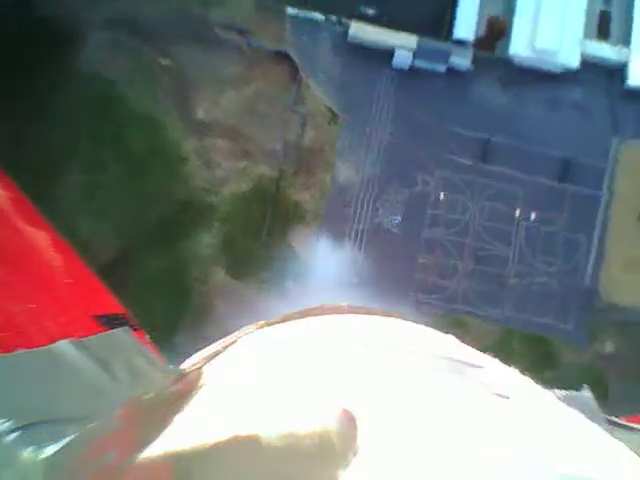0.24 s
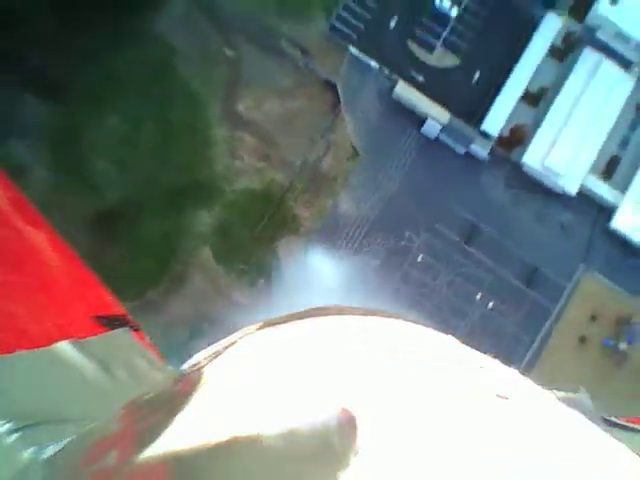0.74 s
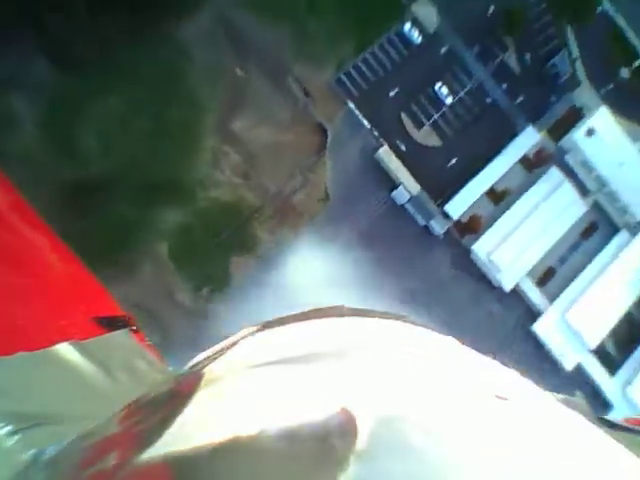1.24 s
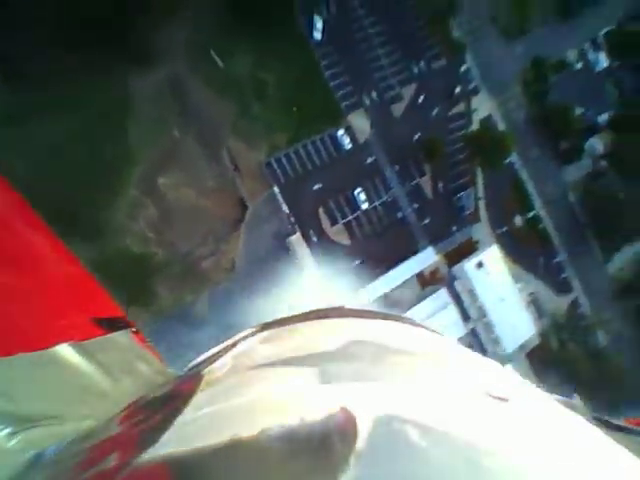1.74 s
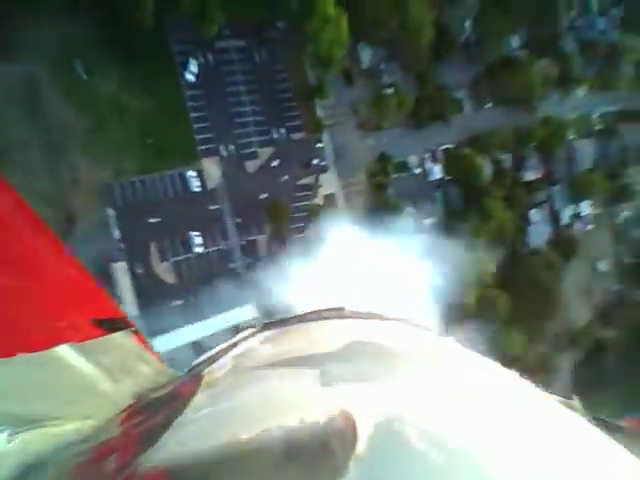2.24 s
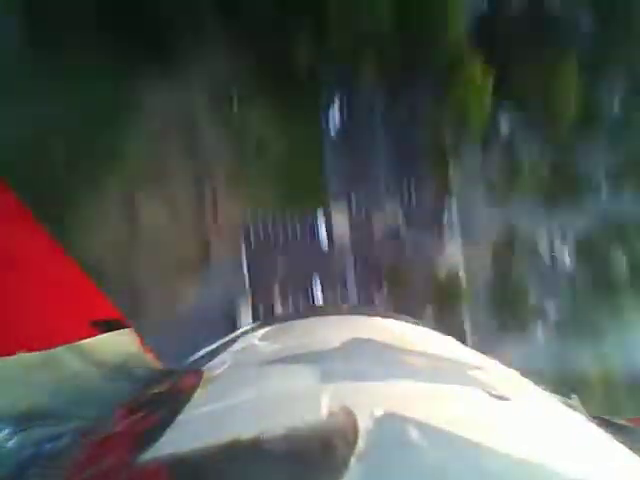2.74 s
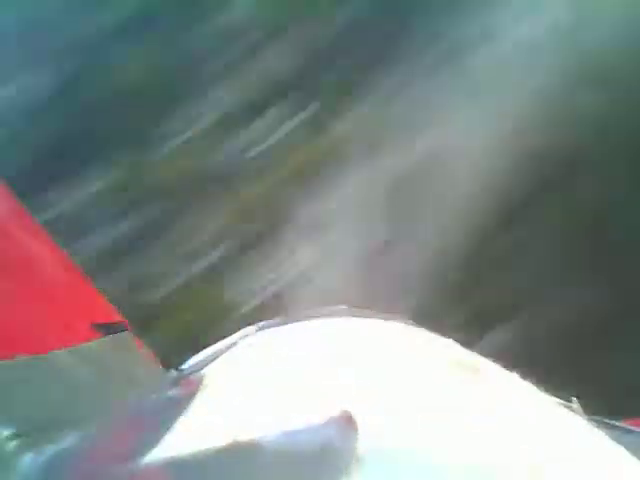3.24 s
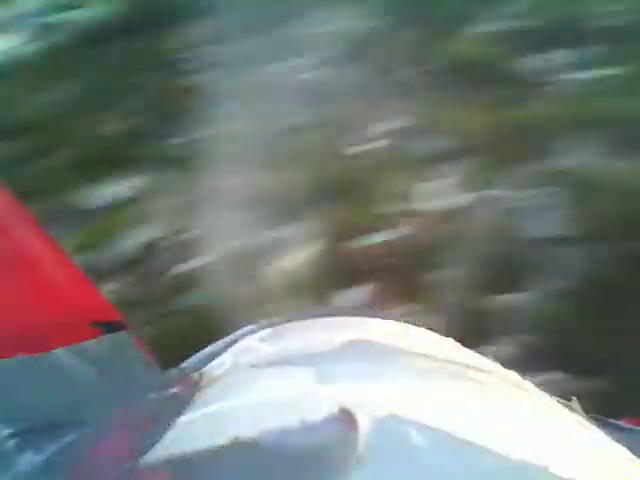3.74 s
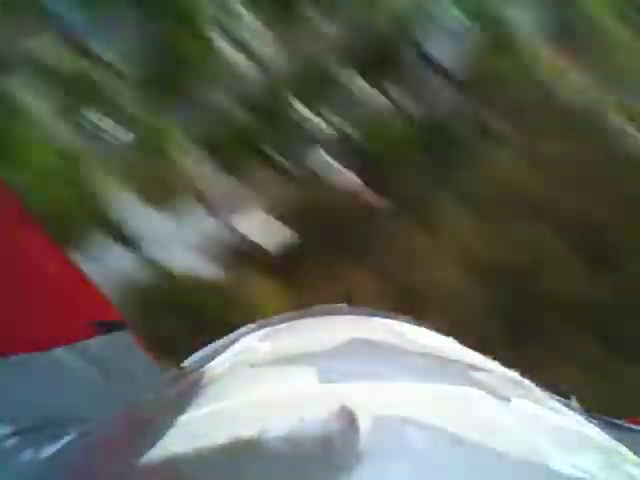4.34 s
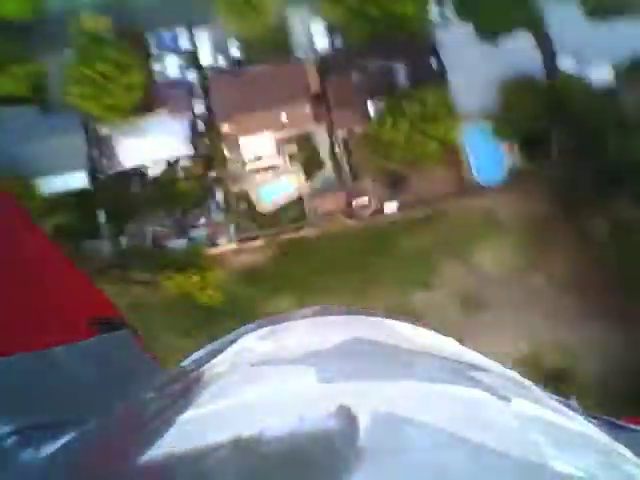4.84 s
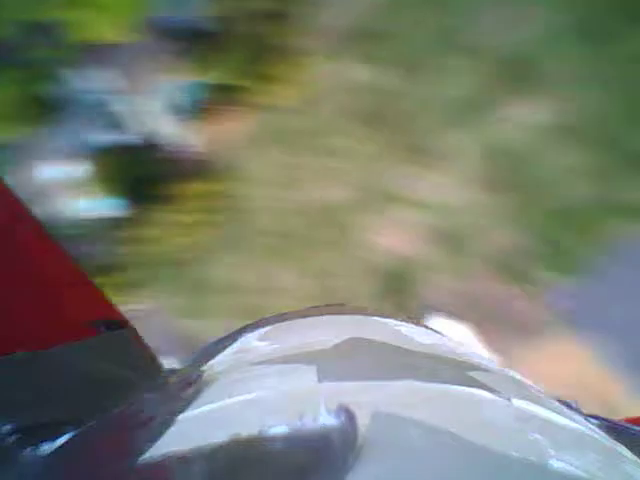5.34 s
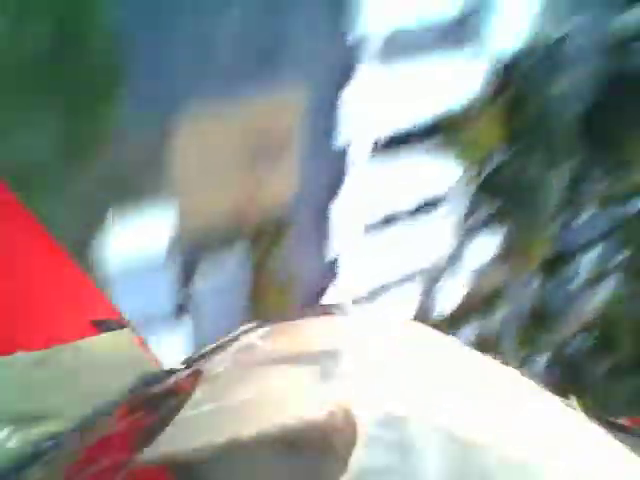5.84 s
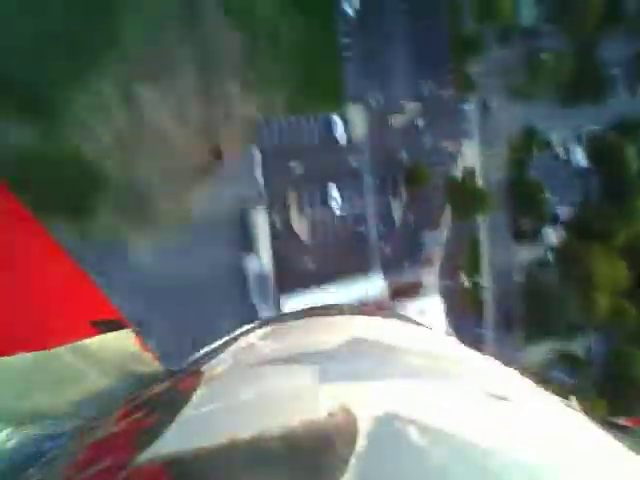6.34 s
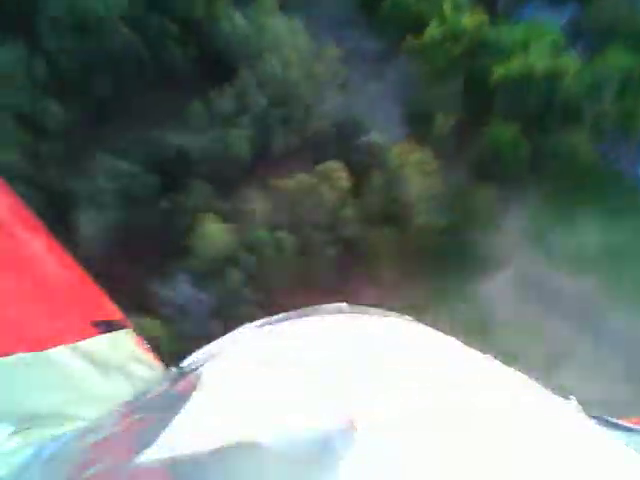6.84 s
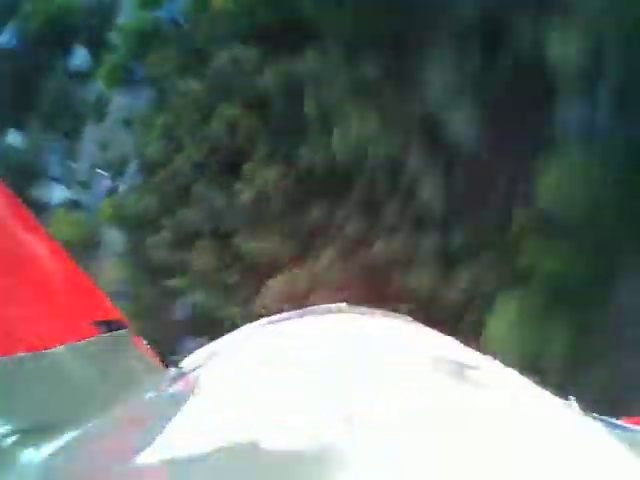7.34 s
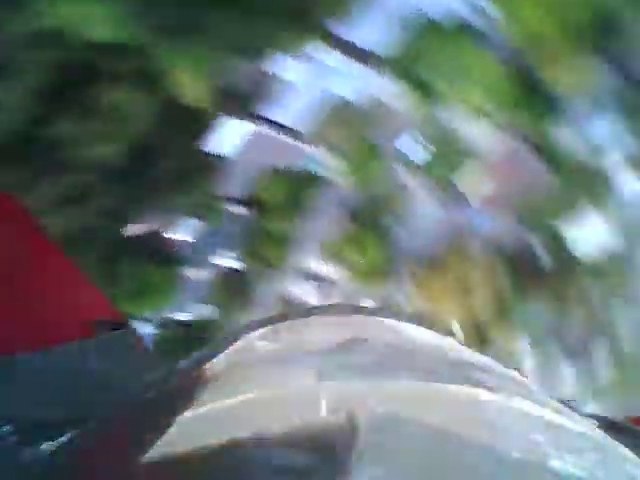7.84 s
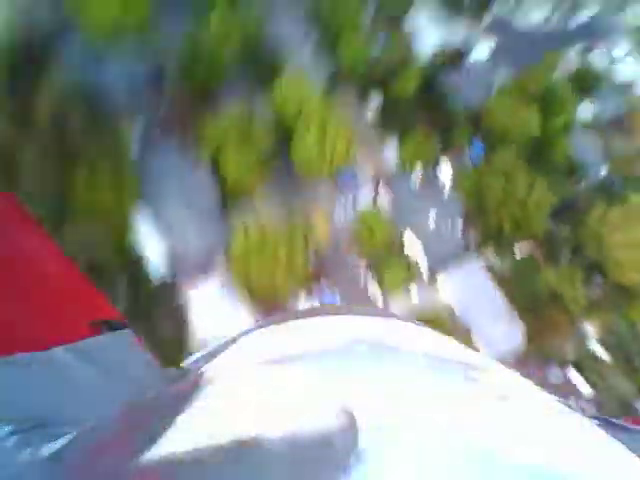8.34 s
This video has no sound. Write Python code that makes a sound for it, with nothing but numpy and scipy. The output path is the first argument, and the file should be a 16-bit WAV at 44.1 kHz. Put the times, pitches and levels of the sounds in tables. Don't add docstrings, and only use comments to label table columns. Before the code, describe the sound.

Close on board a model rocket in open sky, a strong hissing rush of air thins and grows ragged over two seconds. A charge pops abruptly with a choked, overloaded slam. Afterwards the tube swings through gusts, with low wind thumps, hollow knocks, cord scrapes and sharp little ticks. The small built-in microphone sounds dull and clips on the hardest hits.

```python
import sys
import numpy as np
from scipy import signal
from scipy.fft import rfft, irfft
from scipy.io import wavfile
from scipy.ndimage import uniform_filter1d

SR = 44100
rng = np.random.default_rng(int(sys.argv[2]) if len(sys.argv) > 2 else 0)


def digitize_waveform(pressure):
    field = np.atleast_2d(pressure).T
    bounded = np.clip(field, -1, 1)
    quanta = np.round(bounded * 32767).astype(np.int16)
    wavfile.write(sys.argv[1], SR, quanta)


def how_loud(loudness_db):
    steps = np.asarray(loudness_db, float) / 20
    return 10 ** steps


N = 379260
PORT_HZ = 168


def unit_rms(x):
    return x / np.sqrt(np.mean(x ** 2))


def curve(rows, column):
    rows = np.array(rows)
    return how_loud(np.interp(np.arange(N) / SR, rows[:, 0], rows[:, column], left=-120, right=-120))


def walk(rate):
    hold = int(SR / rate)
    steps = np.repeat(rng.standard_normal(N // hold + 1), hold)
    return unit_rms(uniform_filter1d(uniform_filter1d(steps, hold), hold)[:N])


def port(x):
    return signal.lfilter(*signal.butter(1, PORT_HZ, "high", fs=SR), x)


def turbulence(shape, shared_db, own_db, rate):
    hz = np.maximum(np.fft.rfftfreq(N, 1 / SR), 1)
    octave = np.log2(hz)
    shape_hz, shape_db = np.transpose(shape)
    colour = how_loud(np.interp(octave, np.log2(shape_hz), shape_db, left=-90, right=-90))
    colour = colour * np.hypot(1, PORT_HZ / hz)
    spectrum = rfft(rng.standard_normal(N)) * colour
    shared = walk(rate)
    air = 0
    for centre in np.arange(4, 12.6, .5):
        band = irfft(spectrum * np.clip(1 - 2 * abs(octave - centre), 0, 1), N)
        air = air + band * how_loud(shared_db * shared + own_db * walk(.6 * rate))
    return air / np.sqrt(np.mean(port(air) ** 2))


def crackle(rate, spread_db, length_ms, lift):
    when = rng.random(N) < rate / SR
    size = how_loud(spread_db * rng.standard_normal(N))
    spark = np.repeat(np.hanning(64) ** (64 / 44 / length_ms) ** 2, 4)
    return 1 + lift * signal.fftconvolve(when * size, spark, "same")


def swells(crest_s, peak_db, rise_s, fall_s, depth_db, rest_db, edge):
    opens_s = 2.23
    t = np.arange(0, N + 64, 64) / SR
    late = t[:, None] - crest_s
    before, after = -late / np.maximum(rise_s, .003), late / np.maximum(fall_s, .003)
    db = peak_db - depth_db * np.where(late < 0, before, after) ** edge
    power = (how_loud(db) ** 2).sum(axis=1) + how_loud(rest_db) ** 2
    return np.interp(np.arange(N) / SR, t, np.sqrt(power) * (t > opens_s))


def wind():
    # time in seconds, air speed in dB, sideways wobble in dB
    climb = [
        (0.0, -12.5, -25),
        (0.92, -15.5, -20.5),
        (1.59, -20.5, -19),
        (1.89, -27, -29),
        (2.15, -27.5, -29.5),
        (2.18, -28, -34),
    ]
    # crest in seconds, length in seconds, thump on the port in dB,
    # air along the tube in dB
    swings = [(2.38, 0.34, -33.5, -46.5), (2.656, 0.86, -32, -37), (2.966, 0.4, -24, -34.5),
              (3.126, 0.11, -23, -32.5), (3.375, 0.16, -25.5, -36), (3.674, .2, -21, -35.5),
              (3.809, 0.16, -32, -36.5), (3.989, 0.16, -27.5, -38.5), (4.087, 0.18, -29, -36),
              (4.352, 0.14, -30, -40.5), (4.45, .1, -35, -36.5), (4.672, 0.26, -33, -35.5),
              (5.047, .12, -35, -33), (5.261, .18, -24, -34), (5.52, 0.45, -39.5, -36.5),
              (5.769, 0.26, -35, -41), (5.983, 0.27, -26, -33), (6.187, 0.13, -33, -31),
              (6.366, 0.36, -26, -32.5), (6.635, .15, -22.5, -35), (6.763, 0.12, -35, -39),
              (6.901, 0.061, -39, -32), (7.02, 0.14, -27.5, -36.5), (7.315, 0.33, -33, -43),
              (7.529, 0.18, -18, -24), (7.765, 0.4, -30.5, -35.5), (8.097, .3, -32.5, -36),
              (8.307, 0.08, -19, -35.5), (8.396, 0.13, -17.5, -33.5), (8.595, 0.11, -19.5, -35)]
    # time in seconds, lift of the sparks (ratio)
    sparks = [
        (.3, 0.74),
        (1.2, 1.4),
        (1.8, 2.4),
    ]
    # frequency in Hz, density in dB per Hz
    buffet = [(12, -51.5), (20, -12.5), (97, -4), (141, -1.5), (226, -3.5), (290, -9.5), (500, -13.5),
              (700, -52)]
    fast_buffet = [(12, -48.5), (20, -10.5), (296, 4.5), (500, -7), (650, -31.5), (1100, -120)]
    rush_shape = [(150, -24.5), (250, -2), (444, 2), (794, -0.5), (1400, -4.5), (1750, -15), (2860, -28.5),
                  (4840, -67)]
    hiss_shape = [(880, -29.5), (1500, -11), (2280, -14.5), (2560, -15), (3580, -21), (4070, -22),
                  (5290, -61), (8950, -120)]
    rise_share, depth_db, edge = 0.34, 11, 1.09
    lull_thump_db, lull_air_db = -40.5, -50
    hiss_db, hiss_per_speed = -5.5, 1.324
    wind_stop = .7

    crest, length, thump_db, air_db = np.transpose(swings)
    rise, fall = rise_share * length, (1 - rise_share) * length
    speed = curve(climb, 1)
    thumps = swells(crest, thump_db, rise, fall, depth_db, lull_thump_db, edge)
    gusts = swells(crest, air_db, rise, fall, depth_db, lull_air_db, edge)
    climbing = turbulence(fast_buffet, 0.79, 1.7, 40) * curve(climb, 2)
    swinging = turbulence(buffet, 2.8, 1.7, 30) * thumps
    rush = turbulence(rush_shape, 0.76, 1.5, 40) * (speed + gusts)
    lift = np.interp(np.arange(N) / SR, *np.transpose(sparks))
    sparking_hiss = unit_rms(turbulence(hiss_shape, .8, 0.44, 60) * crackle(57, 2.3, 1.6, lift))
    hiss = sparking_hiss * how_loud(hiss_db) * speed ** hiss_per_speed
    return wind_stop * np.tanh((climbing + swinging + rush + hiss) / wind_stop)


def blast():
    fires_s, rise_s, hold_s, fall_s = 2.184, 0.0044, 0.037, 0.0048
    blast_db = -10
    t = np.arange(N) / SR - fires_s
    envelope = np.exp(np.minimum(t, 0) / rise_s - np.maximum(t - hold_s, 0) / fall_s)
    gas = turbulence([(150, -8), (800, 3.5), (2000, -6.5), (4300, -11.5)], 2.4, 0.91, 200)
    return gas * how_loud(blast_db) * envelope


def slams():
    surge_s, surge_for_s, throws = 2.206, .0155, 9
    slam_db, release_s = -12.5, .008
    pinned_db = -30
    t = np.arange(N) / SR
    stays = np.cumsum(np.append(0, .3 + rng.random(throws - 1)))
    times = surge_s + surge_for_s * stays / stays[-1]
    stops = np.append(0., (-1.) ** np.arange(throws))
    side = uniform_filter1d(stops[np.searchsorted(times, t)], 8)
    release = np.exp(-np.maximum(t - times[-1], 0) / release_s)
    free = np.where((t > times[0]) & (t < times[-1]), how_loud(pinned_db), 1)
    return how_loud(slam_db) * side * release, free


def cord():
    # crest in seconds, level in dB, rise in seconds, fall in seconds
    drags = [(2.24, -26.5, .01, 0.069), (2.365, -29, .04, 0.018), (2.439, -28, .03, 0.055),
             (2.595, -34, 0.16, 0.11), (3.125, -29, 0.093, 0.16), (3.504, -33.5, 0.15, 0.13),
             (3.74, -36.5, .1, 0.19), (3.91, -31, 0.032, 0.014), (4.12, -34.5, 0.11, 0.28),
             (2.84, -40.5, 0.067, .03), (4.445, -35.5, 0.015, 0.16), (4.66, -35, 0.081, 0.1),
             (4.8, -36, 0.13, 0.12), (5.06, -30, .07, 0.034), (5.275, -40, 0.12, 0.11),
             (5.505, -35.5, 0.15, 0.034), (5.75, -38.5, 0.21, 0.098), (5.895, -32, 0.067, 0.026),
             (6.199, -26, 0.028, 0.031), (6.34, -38.5, 0.028, 0.1), (6.636, -40.5, 0.063, 0.092),
             (6.79, -37.5, 0.042, 0.039), (6.9, -36, 0.041, 0.045), (7.03, -28.5, 0.043, 0.027),
             (7.295, -46.5, 0.18, 0.42), (7.61, -36.5, 0.14, .1), (7.75, -30, 0.059, 0.036),
             (7.95, -40, 0.23, 0.23), (8.245, -33.5, 0.054, 0.044), (8.4, -32.5, .03, 0.031)]
    # frequency in Hz, density in dB per Hz
    scrape = [(590, -32), (1000, -13), (1500, -10.5), (1850, 1.5), (2400, -8.5), (3050, -3.5), (4200, -16),
              (5290, -50.5)]
    depth_db, slack_db, edge = 21, -50, 1.57
    slips = how_loud(2.4 * walk(30)) * crackle(110, 2.3, 2.0, 2.46)
    rubbing = unit_rms(turbulence(scrape, 3.3, 2.2, 70) * slips)
    return rubbing * swells(*np.transpose(drags), depth_db, slack_db, edge)


def contacts():
    # start in seconds, tube peak in dB, wall peak in dB,
    # camera case peak in dB, contact in ms
    blows = [(2.2455, -43, -11.8, -18, 2.5), (2.3394, -6.5, -6, -16, 4.1), (2.413, -11, -5, -10.5, 4),
             (3.2546, -8, -1, -11.5, 3.2), (3.8053, -11, -18, -16.5, 7.2), (4.4357, -11.5, -9, -11.5, 3.4),
             (5.0079, -10.5, -1.5, -5, 3.9), (5.3891, -12.5, -15, -27, 4.8), (5.421, -5.5, -15, -13.5, 1.5),
             (5.435, -9.5, -8, -2, 1.4), (5.4756, -15.5, -6, -31, 4.1), (5.4969, -17.5, -5, -28, 2.3),
             (5.8628, -8, -5, -8.5, 0.86), (5.8753, -8, -3, -17, 5.1), (6.0377, -18, -8.5, -2, 3.1),
             (6.1944, -16.5, -2.5, -6.5, 2), (6.4875, -15, -4, -5.5, 3.55), (6.6419, -20, -9.5, -16, 2.2),
             (6.9963, -13.5, -14.5, -22, 4.1), (8.0786, -7.5, 0, -0.5, 3.8), (8.381, -23, -8, -26, 2.5),
             (8.5164, -12.5, -5, -34, 4.8), (8.5343, -5, -6, -12.9, 6.4), (8.5779, -16.5, -7, -11, 2.7)]
    # start in seconds, peak in dB, contact in ms
    swivel = [(2.2332, -4, 1), (2.6328, -5.5, 0.8), (2.645, -19.5, 3.3), (3.1785, -2, 2.2),
              (3.201, -23, 2.2), (3.2343, -6, 1), (3.27, -19, 1.5), (3.281, -16.5, 0.83), (3.415, -26, 1.3),
              (3.504, -16, 8.8), (3.5234, -3, 1.83), (3.5354, -11, 1.8), (3.8255, -3, 2.2),
              (4.186, 3, 1.31), (4.191, -4.5, .84), (4.2026, -4, 1), (4.223, -17.5, 1.3), (4.289, -39, 1.1),
              (4.446, -3.5, 2.36), (4.505, -23.5, 2.4), (4.8106, 5, 1.24), (4.834, -36, 1.3),
              (5.032, -10.5, 2.3), (5.7785, -21.5, 1.1), (7.0564, -8, 2.7), (7.1951, -14.5, 1.94),
              (7.9143, 1.5, 1.8), (8.0339, -18, .81)]
    # start in seconds, peak in dB, lean to the tube's hollow in dB, contact in ms
    touches = [(2.5681, -27, -10, 17), (2.76, -17, -5.5, 4.5), (2.996, -20, 12, 2.7),
               (3.012, -14.5, 17, .81), (3.0635, -22.5, -6, 11.6), (3.1035, -19, -7.5, 17),
               (3.361, -20.5, -13, 8.7), (3.463, -23, -25, 4.5), (3.766, -16, 24, 1.2),
               (3.9072, -26, -6, 4.2), (4.78, -26.5, -1, 11), (4.9965, -15, -13, 6.2),
               (5.265, -23, -9, 7.9), (5.7242, -24.5, 1, 3.3), (6.0595, -16.5, -21, 3),
               (6.2301, -17, -6, 4.2), (6.3123, -19.5, 7, 15), (6.63, -19, -6, 4.8),
               (6.8944, -19.5, -4, 8.7), (7.008, -21, 8, 3.2), (7.2943, -22, -5, 4.9),
               (7.326, -20.5, -9, 1.9), (7.462, -23.5, -6, 5.4), (7.4788, -14.5, 15, 7.3),
               (7.5488, -18, 2.5, 2.5), (7.6058, -16.5, -13, 8.6), (7.6498, -18.5, 3.5, 10.5),
               (8.1544, -25, 0, 1.5), (8.2194, -22.5, 1.5, 2.5), (8.284, -17, 1.5, 6.7)]
    tick_tube_db, tick_wall_db, brush_case_db = -28, -19.5, -15.5
    ticks = [(s, db + tick_tube_db, db + tick_wall_db, db, ms) for s, db, ms in swivel]
    brushes = []
    for s, db, lean, ms in touches:
        tube_db, wall_db = db + min(lean, 0), db - max(lean, 0)
        brushes.append((s, tube_db, wall_db, wall_db + brush_case_db, ms))
    return blows + ticks + brushes


def ring(push, modes, detune, spread_db):
    t = np.arange(len(push)) / SR
    luck = rng.standard_normal((len(modes), 2))
    body = 0
    for (hz, db, t60), (louder, sharper) in zip(modes, luck):
        tone = np.sin(2 * np.pi * hz * (1 + detune * sharper) * t)
        body = body + how_loud(db + spread_db * louder) * tone * 1000. ** (-t / t60)
    sound = signal.fftconvolve(push, body)[:len(t)]
    return sound / abs(sound).max()


def knocks():
    # frequency in Hz, level in dB, 60 dB decay time in seconds
    tube = [(178, -13.5, 0.11), (466, -11, 0.066), (536, -7.5, 0.038)]
    wall = [(860, -4, 0.018), (1085, -5.5, 0.022), (1250, -3, 0.029), (1454, 4.5, 0.008), (1820, 2.5, 0.02),
            (2320, -2, 0.0076)]
    case = [(2450, 3.5, 0.011), (2950, 7.5, 0.0064), (3020, 0, 0.0082), (3185, 6, 0.0069),
            (4140, -5.5, 0.0046)]
    out = np.zeros(N + 6000)
    t = np.arange(6000) / SR
    for s, *peaks_db, contact_ms in contacts():
        tau = max(contact_ms - 1.0, .2) / 1000
        push = rng.standard_normal(len(t)) * (t / tau) ** 0.8 * np.exp(-1.3 * t / tau)
        blow = 0
        for db, modes in zip(peaks_db, (tube, wall, case)):
            blow = blow + how_loud(db) * ring(push, modes, 0.029, 2.9)
        height = np.linalg.norm(how_loud(np.array(peaks_db)))
        start = int(s * SR)
        out[start:start + len(t)] += blow * height / abs(blow).max()
    return out[:N]


def scene():
    jumps, free = slams()
    heard = wind() + blast() + cord() + knocks()
    return (heard * free + jumps)[None]


def roll_off(x):
    return signal.sosfilt(signal.butter(12, 16600, fs=SR, output="sos"), x)


def record(dry):
    stop, gain, clip = 1.3, 1.15, .72
    top_hz = 4200
    capsule = port(stop * np.tanh(dry / stop))
    steep = signal.cheby2(9, 55, 1.2545 * top_hz, fs=SR, output="sos")
    narrow = signal.sosfiltfilt(steep, capsule)
    clipped = np.clip(gain * narrow, -clip, clip)
    return roll_off(clipped)


dry = scene()
out = record(dry)
digitize_waveform(out)
```